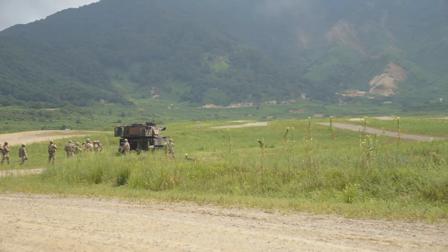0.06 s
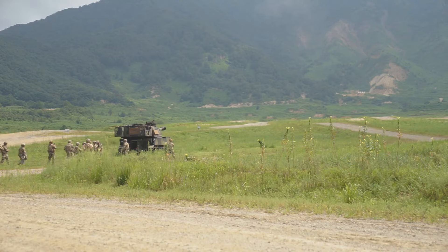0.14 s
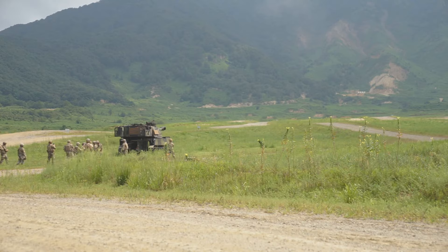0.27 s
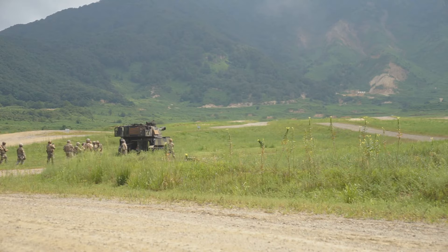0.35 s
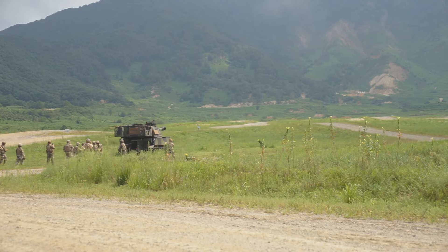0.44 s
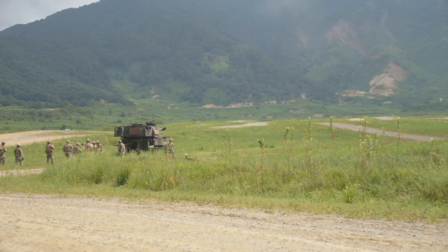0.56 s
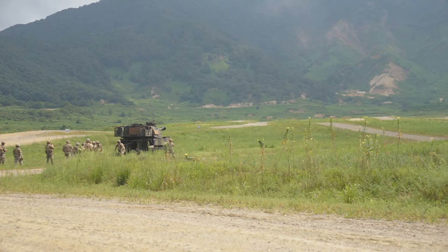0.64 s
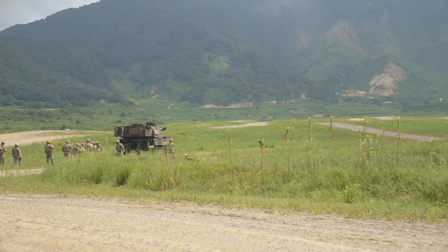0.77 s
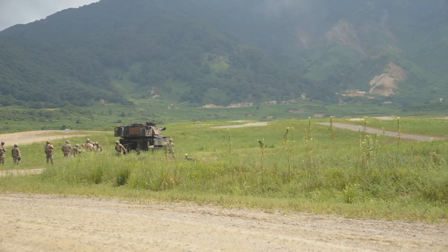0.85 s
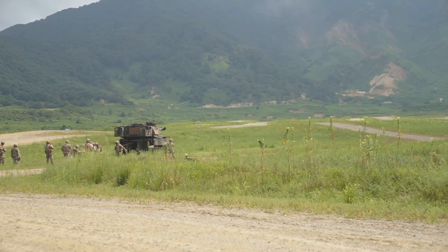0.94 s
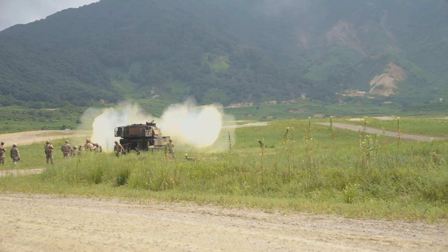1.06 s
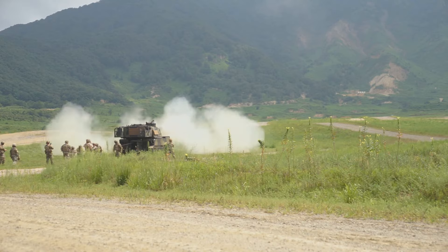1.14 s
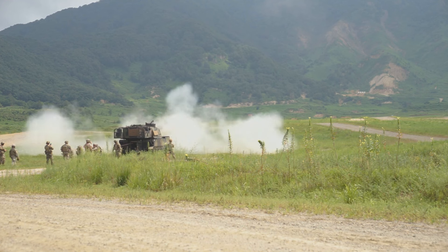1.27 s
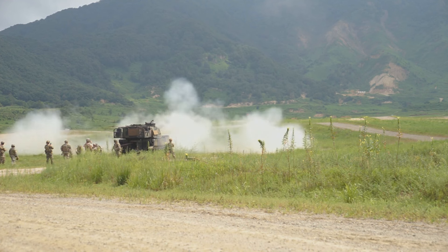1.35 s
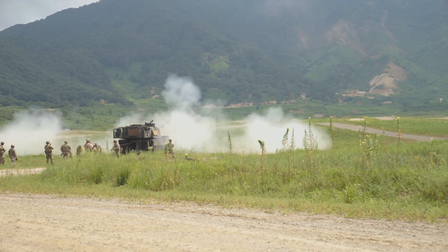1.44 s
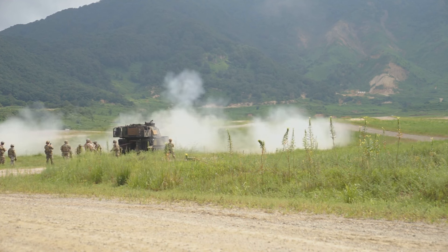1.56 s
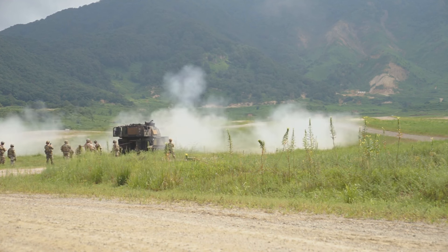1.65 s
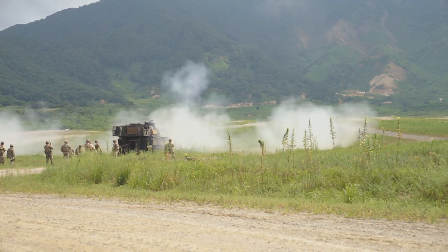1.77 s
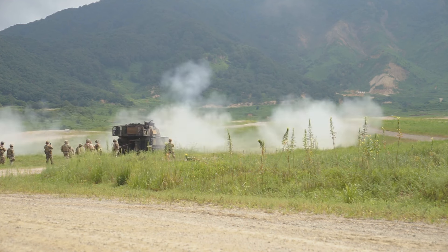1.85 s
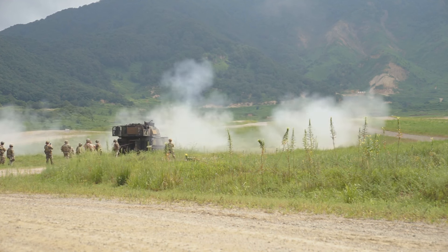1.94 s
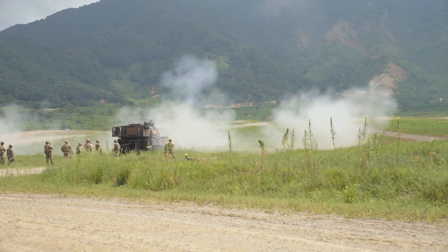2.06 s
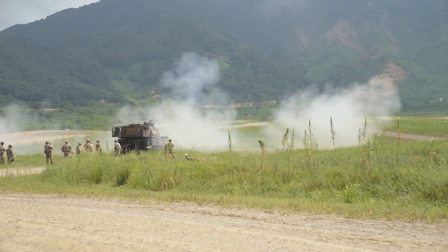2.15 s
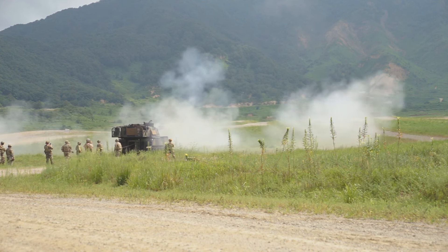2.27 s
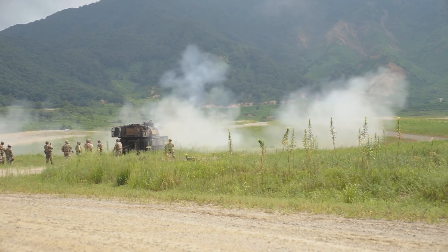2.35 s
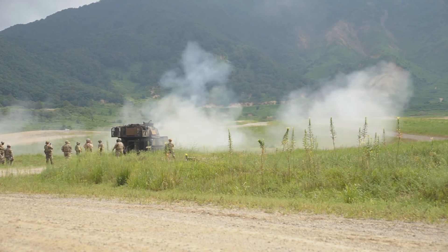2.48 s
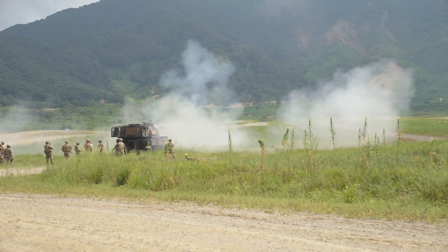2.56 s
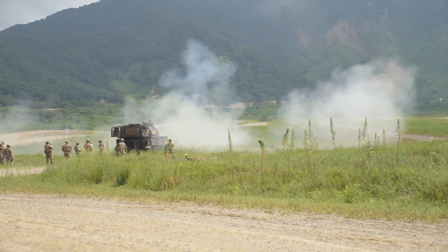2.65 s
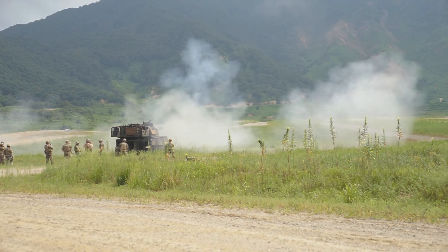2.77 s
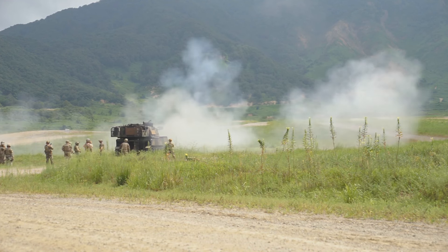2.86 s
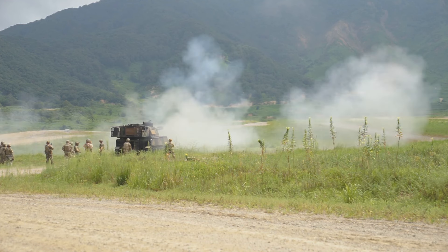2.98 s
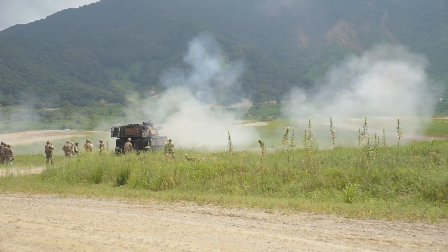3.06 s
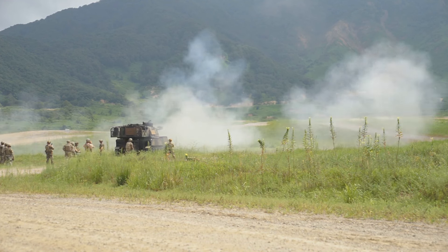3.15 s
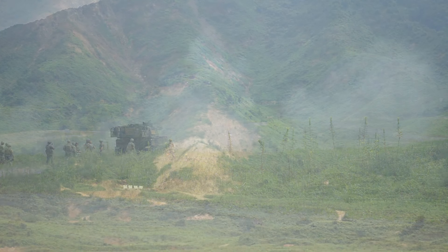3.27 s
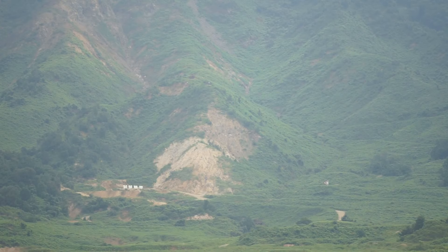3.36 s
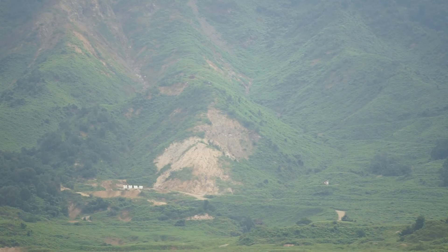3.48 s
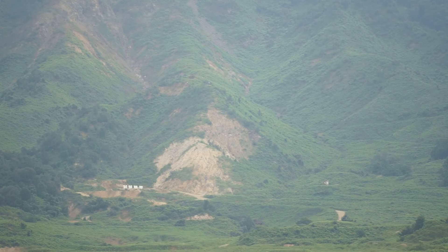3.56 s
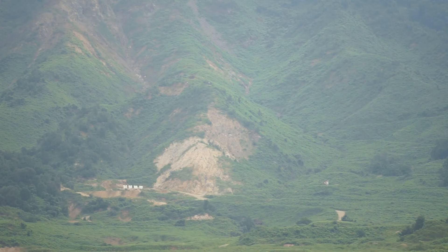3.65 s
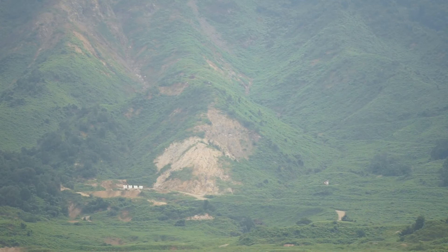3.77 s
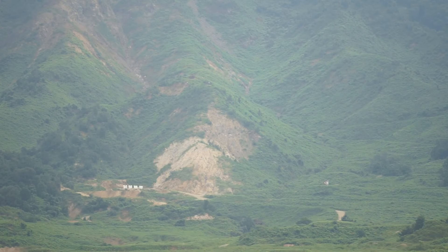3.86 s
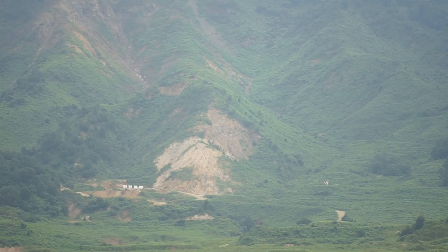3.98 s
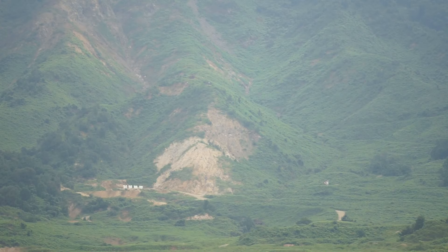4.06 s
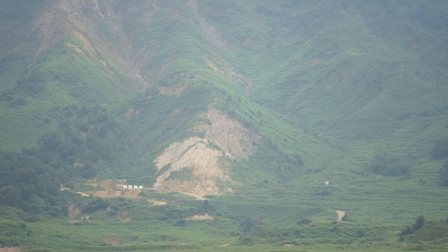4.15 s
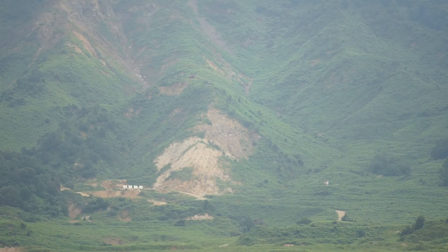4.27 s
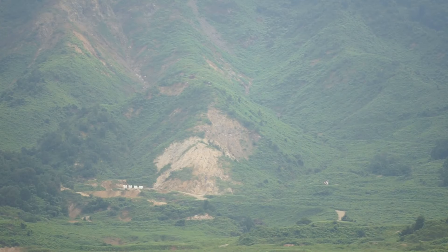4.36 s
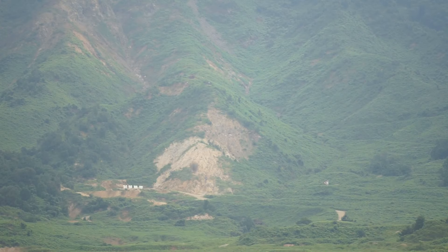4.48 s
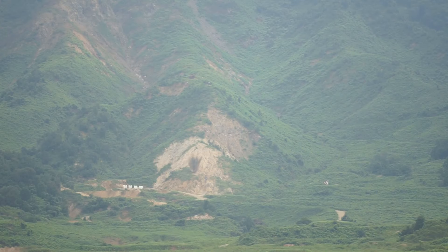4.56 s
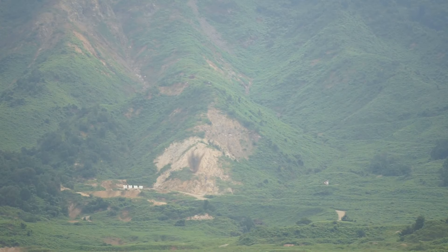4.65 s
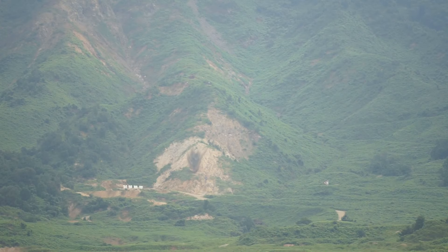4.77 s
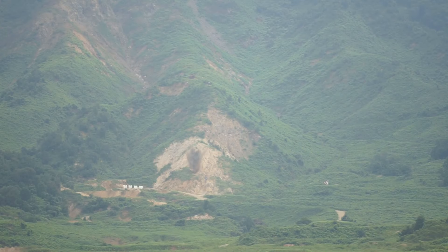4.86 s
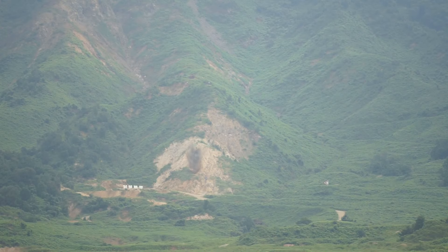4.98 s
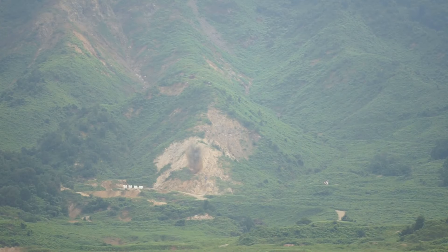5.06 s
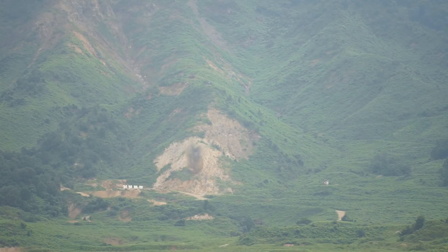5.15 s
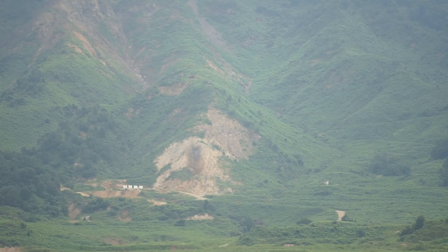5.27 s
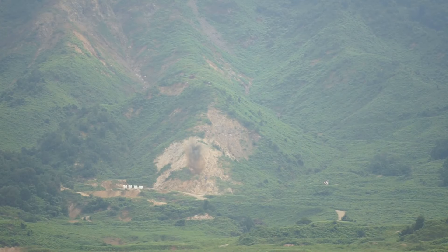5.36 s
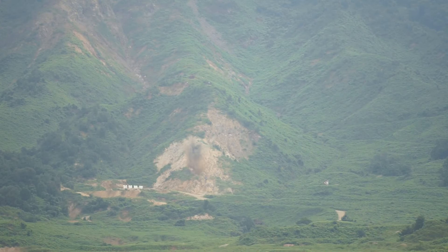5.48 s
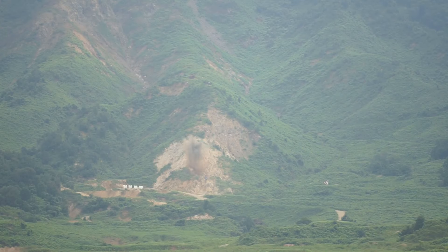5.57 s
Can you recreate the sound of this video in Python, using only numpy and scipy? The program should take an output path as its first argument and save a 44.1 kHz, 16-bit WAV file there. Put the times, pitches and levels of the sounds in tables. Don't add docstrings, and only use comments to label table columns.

```python
import sys
import numpy as np
from scipy import signal
from scipy.fft import rfft, irfft, next_fast_len
from scipy.io import wavfile
from scipy.ndimage import uniform_filter1d, map_coordinates

SR = 44100
rng = np.random.default_rng(int(sys.argv[2]) if len(sys.argv) > 2 else 0)


def convert_level_to_amplitude(level_db):
    exponent = np.asarray(level_db, float) / 20
    return 10 ** exponent


def output_pcm(signal):
    pcm = np.clip(np.atleast_2d(signal).T, -1, 1) * 32767
    wavfile.write(sys.argv[1], SR, np.round(pcm).astype(np.int16))


N = 247833
T = np.arange(N) / SR

# start_s, steady_pressure_rails, turbulence_rms_rails
BLAST_FRONTS = [(1.352, 3, .2), (1.3525, -4, .6), (1.3572, .6, 3), (1.3602, 3, 1.25), (1.3684, -1.3, 2),
                (1.371, -4, .8), (1.3732, .3, 3), (1.3912, -3, .8), (1.397, -2.4, 1.3), (1.3995, 1.5, 1.5),
                (1.4015, -1.5, 1.1), (1.4095, 2.5, .6), (1.4115, 0, 0)]
# frequency_hz, density_db
TURBULENCE_SPECTRUM = [(100, -12), (250, -5.5), (500, -9.5), (900, 1), (2200, -15.5), (3500, -11),
                       (6000, -21), (14000, -31.5)]

# start_s, crack_peak_db, thump_db, thump_hz, thump_cycles
BANK_ECHOES = [(1.452, -14, -6, 73.5, 1.6), (1.4636, -26, -7.5, 69.84, 1.5), (1.6411, -5.5, -9, 1380, 3),
               (1.6417, -5, -0.5, 119, 0.51), (1.775, -40, -25, 31.8, 1.5), (1.931, -37, -17, 65.6, 2.5),
               (1.951, -17, -14.5, 800, 1.1), (1.980, -28, -10.5, 212, 1.4), (1.984, -8, -12, 670, 2.3),
               (1.989, -11, -16, 690, 1.3), (2.023, -23, -13.5, 300, .8), (2.0487, -17, -10.5, 760, 1.3),
               (2.155, -23, -14, 605, 0.99), (2.24, -40, -19, 36, 1.8), (2.329, -27, -16, 704, 4.5),
               (2.804, -26, -19, 380, 1.1), (2.86, -45, -28, 45, 2.1), (2.989, -37, -29, 397, 1.7),
               (3.088, -38, -27, 430, 1.2), (3.259, -24, -31, 248.3, 0.94)]
# start_s, peak_db
FACE_SNAPS = [
    (1.6397, -5),
    (1.6984, -17),
]
CRACK_MS, SNAP_MS = 0.425, 0.095

# frequency_hz, density_db
ROLL_SPECTRUM = [(12, -31), (25, 1.5), (64, 2), (170, -4), (320, -13), (530, -16), (700, -12.5),
                 (1700, -20), (3500, -25.5), (6000, -33), (9000, -45), (12500, -50), (15500, -53.5)]
BAND_EDGES_HZ = [300, 600, 3500, 8700]
# peak_s, rise_s, roar_db, fall_db_per_s, rumble_db
FIELD_STRETCHES = [
    (1.418, 0.032, -13.5, 170, -5.5),
    (1.49, 0.11, -26.5, 75.5, -15),
    (1.665, 0.089, -28, 204, -17.5),
    (1.702, 0.014, -27.5, 125, -22),
    (1.84, .2, -41.5, 12, -30),
    (1.95, 0.078, -33.5, 152, -18.5),
]
# peak_s, rise_s, roar_db, fall_db_per_s, rumble_db
SLOPE_STRETCHES = [
    (1.987, 0.01, -27.5, 20.7, -34),
    (2.08, 0.061, -34.5, 30, -19),
    (2.17, 0.032, -29.5, 41, -21.5),
    (2.27, 0.056, -30, 100, -28),
    (2.35, 0.3, -30, 32.7, -49),
    (2.68, 0.26, -37.5, 15.3, -41),
    (2.84, 0.066, -39.5, 40, -35),
    (3.1, .15, -50, 22, -41),
    (3.35, 0.23, -51.5, 9.5, -55),
]
# first_arrival_db, path_gain_db_per_s, share_of_fall_ratio
GRAZING_PATH = [
    (0, -3, 0.077, -2, -7.5),
    (0, -18.5, 0.028, 0, -9),
    (.6, 1, 1, .8, 1.15),
]
# first_arrival_db, path_gain_db_per_s, share_of_fall_ratio
LOFTY_PATH = [
    (0, -11, 0, 0.5, -19.5),
    (0, 6, 0, -8.5, -7.5),
    (1.2, 0.84, 1, 1.07, 0.9),
]
SETTLED_PATH_S = np.array([[5], [1.7], [5], [5], [1.3]])
SWELL_DB = 24

SHAFT_HZ = 24.6
# shaft_multiple, level_db
SHAFT_ORDERS = [(2, -14), (3, -12), (4, 1.5), (5, -19.5), (6, -11.5), (7, -7), (8, -15), (9, -18),
                (10, -19), (12, -21.5), (14, -24)]
# pitch_hz, level_rms_db
GEAR_WHINE = [(344.5, -70), (592.2, -70.5), (635.2, -71.5), (672.9, -57.5), (845.2, -60.5), (888.2, -68.5),
              (952.8, -70), (985.1, -65), (1082, -60.5), (1270, -70), (1378, -77.5), (1588, -71.5),
              (1610, -72.5), (1685, -61.5), (2223, -83.5), (2530, -74.5), (2729, -78.5), (2859, -80),
              (3020, -82.5), (3176, -84), (3370, -73), (4043, -76.5)]
# frequency_hz, density_db
IDLE_SPECTRUM = [(15, -26), (35, -14), (90, -1), (170, -5), (320, -17.5), (550, -16), (900, -14),
                 (1500, -22), (2100, -26.5), (3500, -32), (5500, -39), (8000, -50.5), (11000, -60.5),
                 (15000, -69.5)]
IDLE_DB = -41.5

# start_s, length_s, pitch_hz, peak_db
METAL_SQUEAKS = [
    (.1, .11, 2230, -75),
    (.1, 0.12, 2740, -66),
    (.1, 0.12, 3225, -70),
    (4.748, 0.031, 4110, -63),
    (5.345, .035, 3560, -59),
]

# frequency_hz, gain_db
HOUSING_RIPPLES = [(2500, -1), (3500, 1), (4500, -5.5), (5800, -1), (7000, -4.5), (8000, 2), (9000, -2.5),
                   (12000, 0)]
TOP_HZ = 15000


def unit(x):
    return x / np.sqrt(np.mean(x ** 2) + 1e-20)


def along(points, hz):
    f, value = np.transpose(points)
    return np.interp(np.log(hz + 1), np.log(f + 1), value)


def wobble(rate, count=1):
    coarse = np.arange(0, N + 256, 256) / SR
    knots = rng.standard_normal((count, int(N * rate / SR) + 5))
    return [np.interp(T, coarse, map_coordinates(k, [coarse * rate])) for k in knots]


def filtered(x, response):
    size = next_fast_len(N + 8192)
    spectrum = rfft(x, size) * response(np.fft.rfftfreq(size, 1 / SR))
    return irfft(spectrum, size)[..., :N]


def noise(spectrum, patchy_db=0, spiky_db=0):
    white = rng.standard_normal(N) * convert_level_to_amplitude(spiky_db * rng.exponential(size=N))
    z = signal.stft(white, nperseg=512)[2]
    field = uniform_filter1d(rng.standard_normal(z.shape), 8, 0)
    field = uniform_filter1d(field, 8, 1)
    white = signal.istft(z * convert_level_to_amplitude(patchy_db * unit(field)), nperseg=512)[1][:N]
    return filtered(white, lambda hz: convert_level_to_amplitude(along(spectrum, hz)))


def blast():
    start, steady, rough = np.transpose([(0, 0.017, 0)] + BLAST_FRONTS)
    front = np.searchsorted(start, T, side="right") - 1
    return steady[front] + rough[front] * unit(noise(TURBULENCE_SPECTRUM))


def echoes():
    out = np.zeros(N + SR)
    t = np.arange(SR // 8) / SR

    def spike(db, decay_ms):
        x = 1000 * t / decay_ms
        return 1.8 * convert_level_to_amplitude(db) * (1 - x) * np.exp(-x)

    waves = [(start, spike(db, SNAP_MS)) for start, db in FACE_SNAPS]
    for start, crack_db, thump_db, hz, cycles in BANK_ECHOES:
        fade = np.exp(-(hz * t / cycles) ** 2)
        thump = -convert_level_to_amplitude(thump_db) * np.sin(2 * np.pi * hz * t) * fade
        waves.append((start, spike(crack_db, CRACK_MS) + thump))
    for start, wave in waves:
        path_s = start - BLAST_FRONTS[0][0]
        front = np.hanning(int(3 + 16 * path_s))
        rounded = np.convolve(wave, front / front.sum())[:len(t)]
        out[round(start * SR):][:len(t)] += rounded
    return out[:N]


def scattered(ground, path):
    first_db, per_s, share = np.array(path)[:, :, None]
    t = T[::64]
    path_s = np.clip(t - BLAST_FRONTS[0][0], 0, SETTLED_PATH_S)
    power = 0
    for peak_s, rise, roar_db, fall, rumble_db in ground:
        peak_db = np.array([[rumble_db]] + [[roar_db]] * 4)
        swell = SWELL_DB * (t - peak_s) / rise
        decay = fall * share * (peak_s - t)
        shape_db = np.where(t < peak_s, swell, decay)
        power = power + convert_level_to_amplitude(2 * (peak_db + shape_db + first_db + per_s * path_s))
    return np.array([np.interp(T, t, p) for p in power])


def roll():
    sound = noise(ROLL_SPECTRUM, patchy_db=1.0, spiky_db=1.51)
    edges = np.array(BAND_EDGES_HZ)[:, None]

    def band_split(f):
        lowpasses = np.vstack([0 * f, 1 / (1 + (f / edges) ** 8), 1 + 0 * f])
        return np.diff(lowpasses, axis=0)

    bands = filtered(sound, band_split)
    gains = np.sqrt(scattered(FIELD_STRETCHES, GRAZING_PATH) + scattered(SLOPE_STRETCHES, LOFTY_PATH))
    total = sum(g * unit(b) for b, g in zip(bands, gains))
    flutter_db = 0.19 * wobble(30)[0]
    onset = np.clip((T - 1.401) / 0.0048, 0, 1)
    return total * convert_level_to_amplitude(flutter_db) * onset


def tones(lines, clock, sway_db, rate):
    total = 0
    for (hz, db), sway in zip(lines, wobble(rate, count=len(lines))):
        level = np.sqrt(2) * convert_level_to_amplitude(db) * (1 + sway_db / 9.6 * sway)
        total = total + level * np.sin(2 * np.pi * (hz * clock + rng.random()))
    return total


def engine():
    shaft = np.cumsum(1 + 0.0052 * wobble(5.5)[0]) / SR
    gears = np.cumsum(1 + 0.0007 * wobble(2.2)[0]) / SR
    order_lines = [(k * SHAFT_HZ, db - 45.5) for k, db in SHAFT_ORDERS]
    orders = tones(order_lines, shaft, sway_db=1.5, rate=7)
    whine = tones(GEAR_WHINE, gears, sway_db=0.9, rate=13)
    firing = 1 + 0.097 * np.sin(2 * np.pi * 4 * SHAFT_HZ * shaft)
    bed = unit(noise(IDLE_SPECTRUM, patchy_db=0.76, spiky_db=1.4)) * firing
    bed_db = IDLE_DB - 5.5 + 0.53 * wobble(2.5)[0]
    return orders + whine + convert_level_to_amplitude(bed_db) * bed


def squeaks():
    out = np.zeros(N)
    for start, length, hz, db in METAL_SQUEAKS:
        u = np.arange(round(length * SR)) / (length * SR)
        pitch = hz * (1 - 0.078 * (u - 0.5) ** 2)
        tone = np.sin(2 * np.pi * np.cumsum(pitch) / SR)
        out[round(start * SR):][:len(u)] += convert_level_to_amplitude(db) * np.sin(np.pi * u) * tone
    return out


def scene():
    air = filtered(roll() + engine(), lambda f: convert_level_to_amplitude(along(HOUSING_RIPPLES, f)))
    return (blast() + echoes() + squeaks() + air) * np.ones((2, 1))


def roll_off(x):
    return signal.sosfilt(signal.butter(12, 16290, fs=SR, output="sos"), x)


def record(dry):
    hiss = convert_level_to_amplitude(-91) * rng.standard_normal(dry.shape)
    driven = dry * convert_level_to_amplitude([[0.7], [-0.8]]) + hiss
    railed = np.clip(driven, -0.87, 0.87)
    railed = railed + 0.025 * (driven - railed)

    def electronics(f):
        capacitor = 1j * f / (52 + 1j * f)
        treble_loss = 1 / (1 + 1j * f / 9500)
        top_edge = 0.5 - 0.5 * np.tanh((f - TOP_HZ) / 90)
        return capacitor * treble_loss * top_edge

    drained = filtered(railed, electronics)
    return roll_off(np.clip(drained, -1, 1))


dry = scene()
out = record(dry)
output_pcm(out)
```